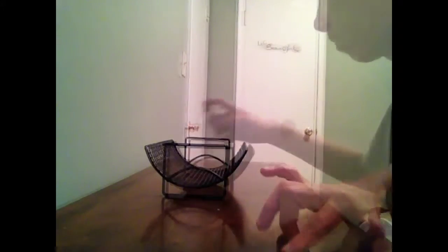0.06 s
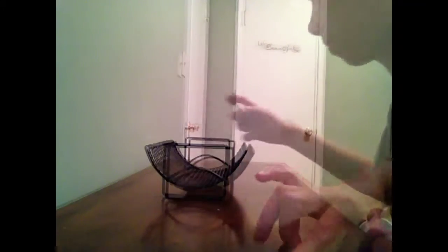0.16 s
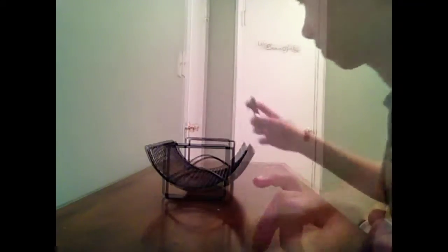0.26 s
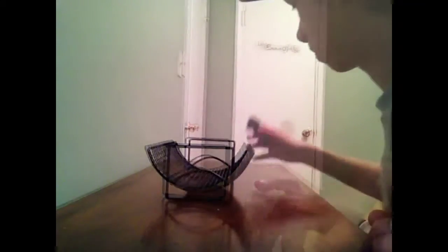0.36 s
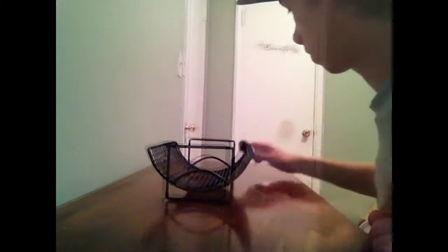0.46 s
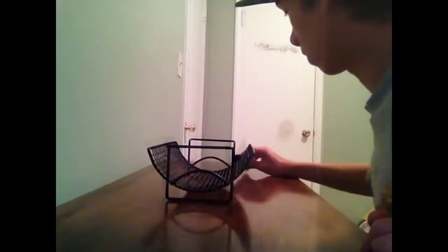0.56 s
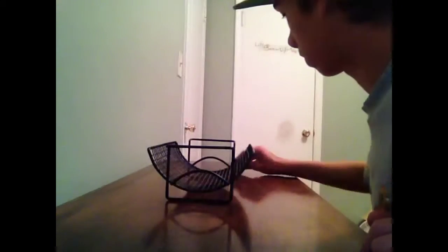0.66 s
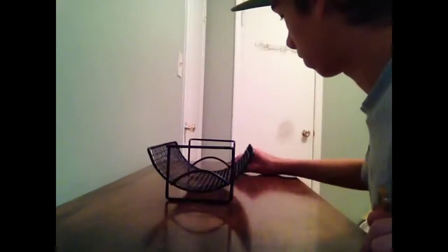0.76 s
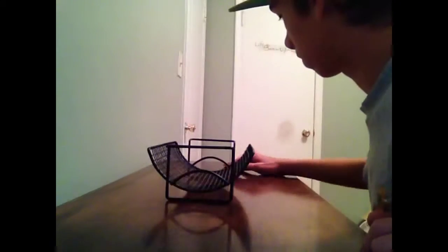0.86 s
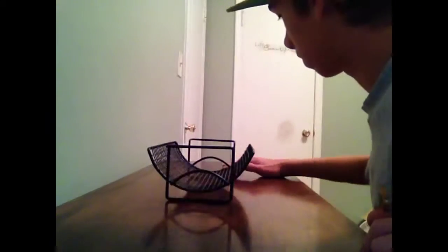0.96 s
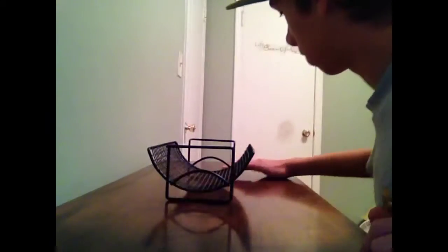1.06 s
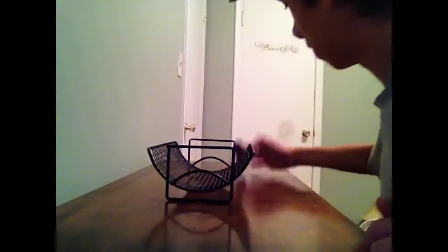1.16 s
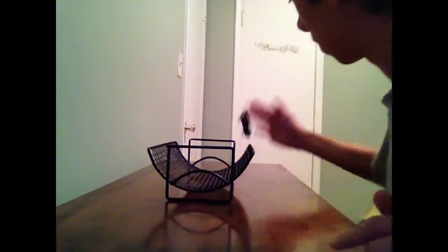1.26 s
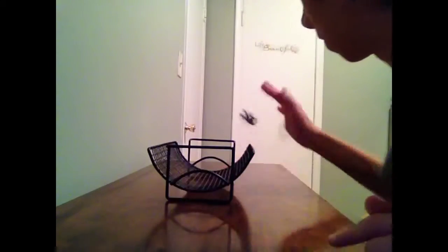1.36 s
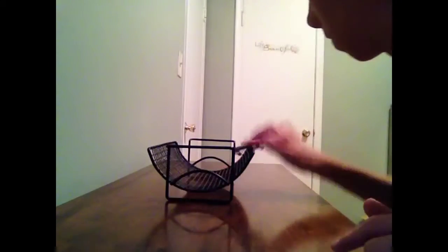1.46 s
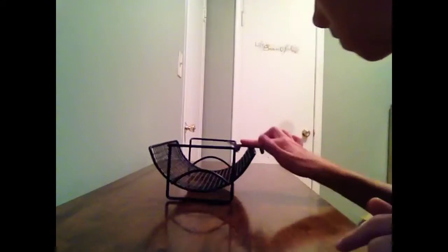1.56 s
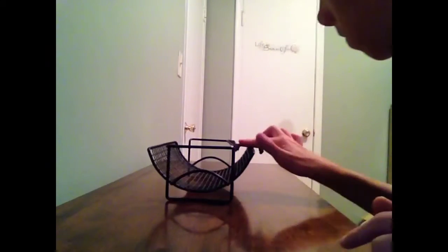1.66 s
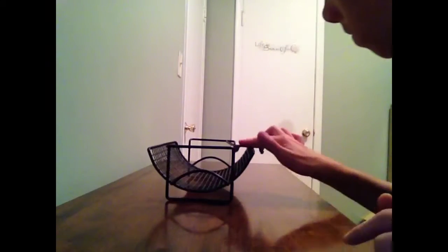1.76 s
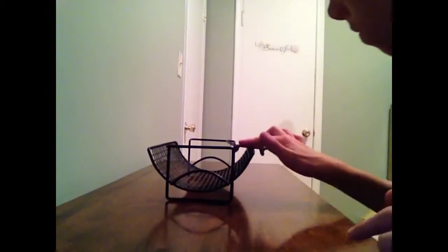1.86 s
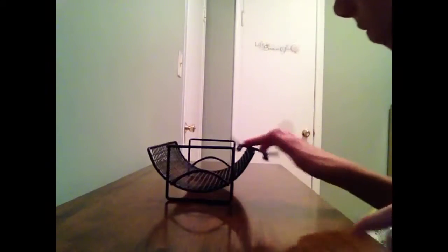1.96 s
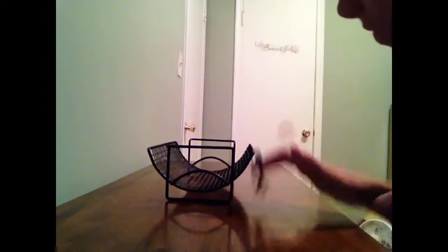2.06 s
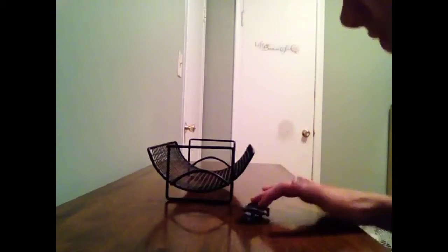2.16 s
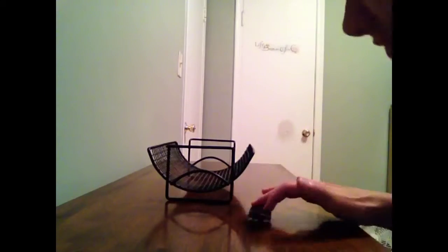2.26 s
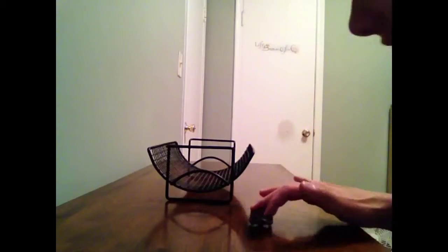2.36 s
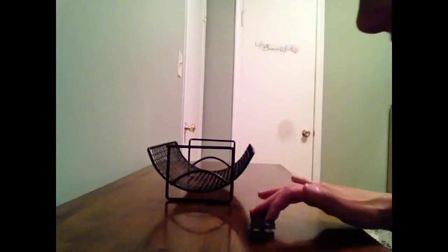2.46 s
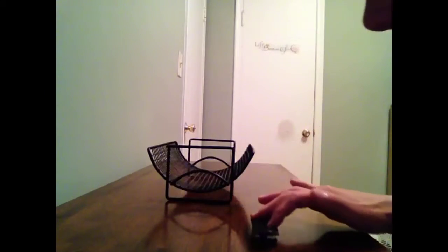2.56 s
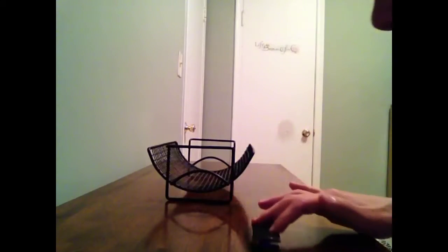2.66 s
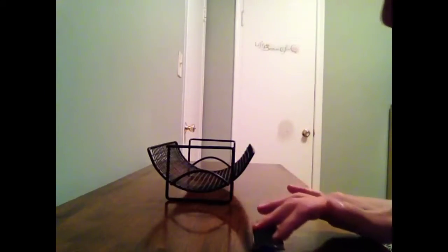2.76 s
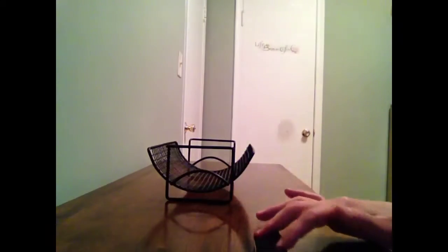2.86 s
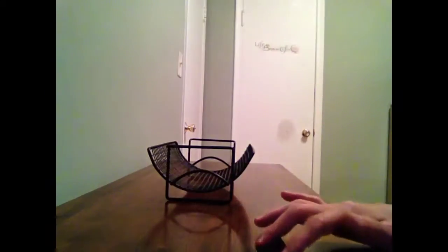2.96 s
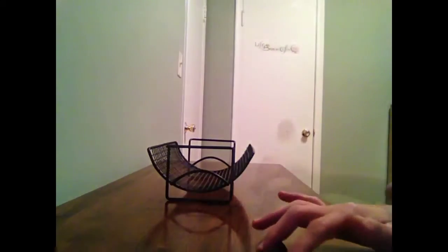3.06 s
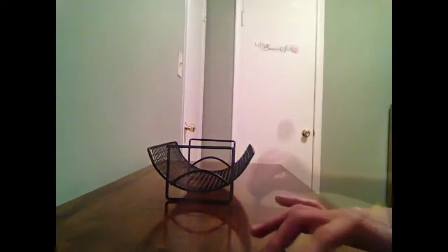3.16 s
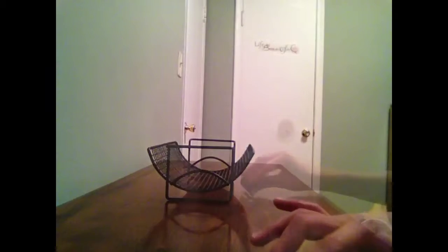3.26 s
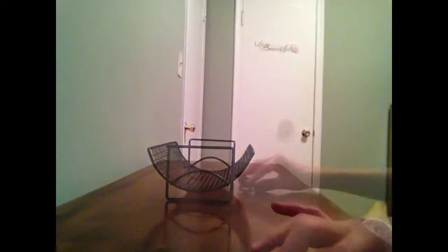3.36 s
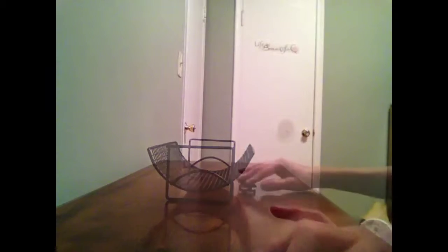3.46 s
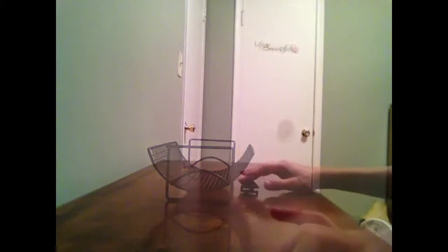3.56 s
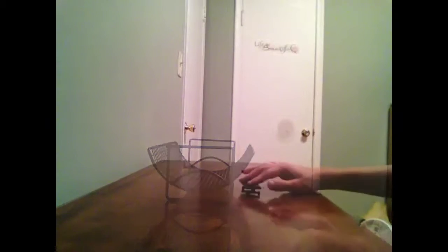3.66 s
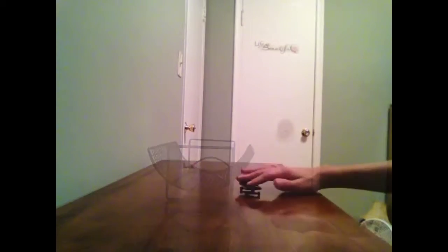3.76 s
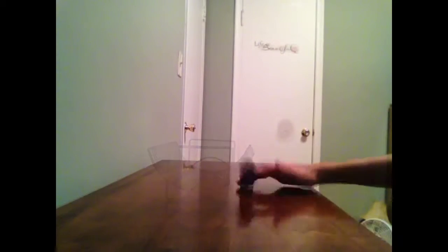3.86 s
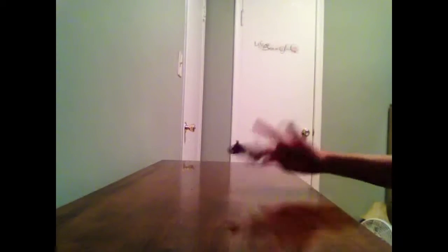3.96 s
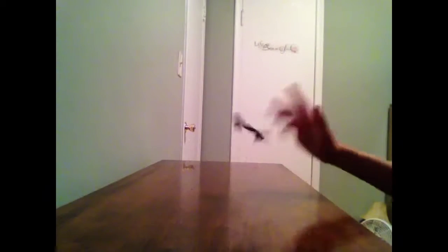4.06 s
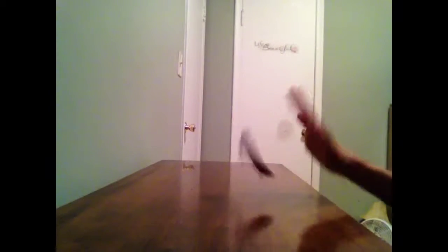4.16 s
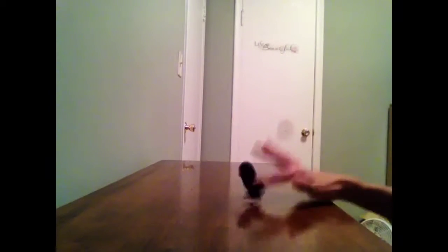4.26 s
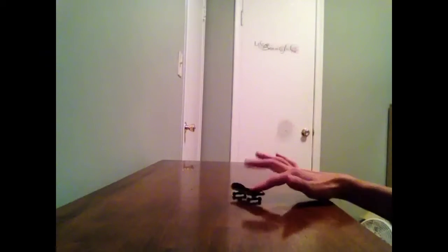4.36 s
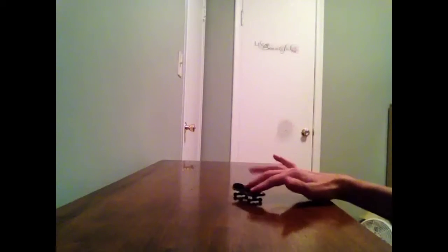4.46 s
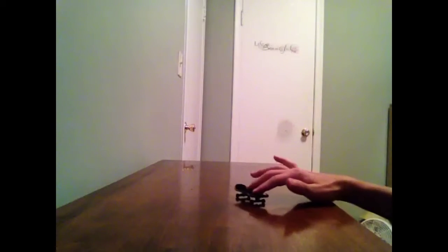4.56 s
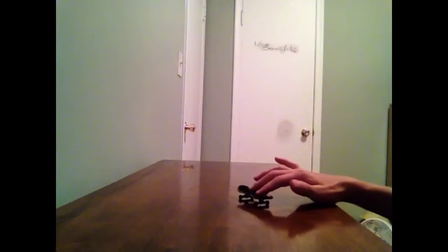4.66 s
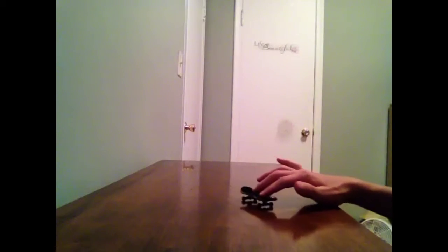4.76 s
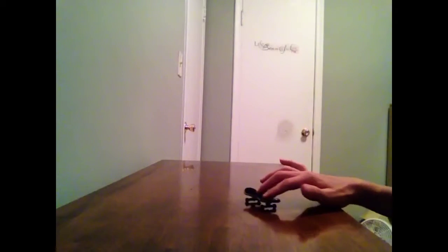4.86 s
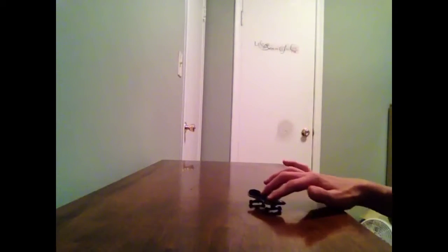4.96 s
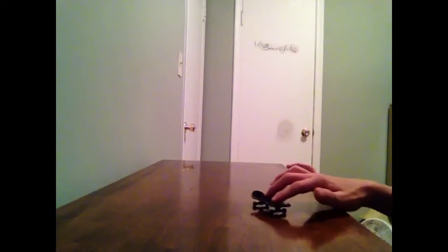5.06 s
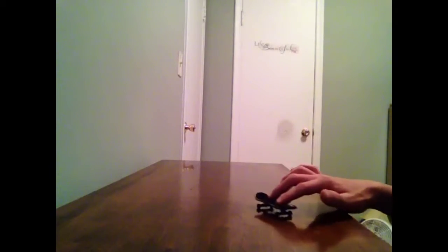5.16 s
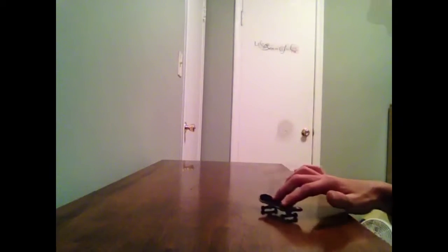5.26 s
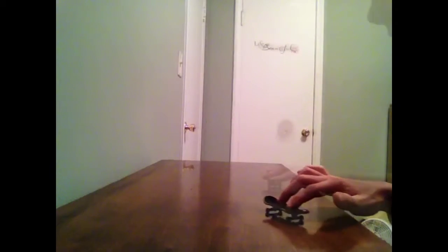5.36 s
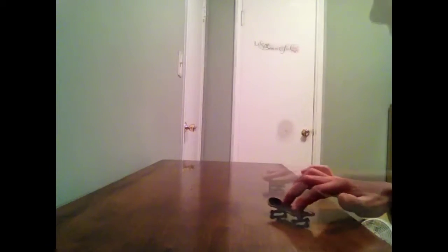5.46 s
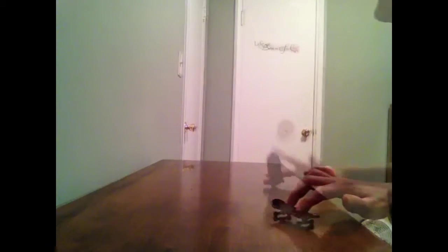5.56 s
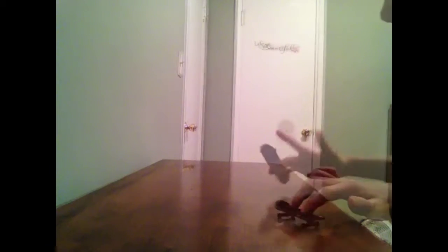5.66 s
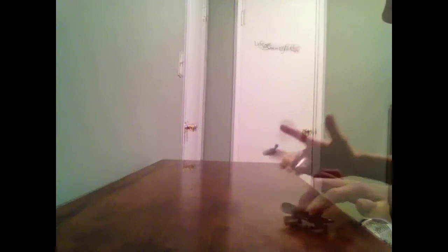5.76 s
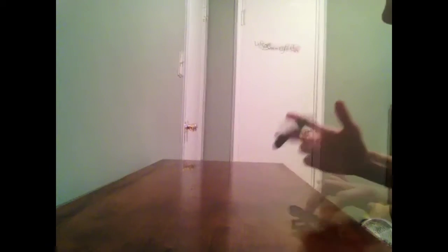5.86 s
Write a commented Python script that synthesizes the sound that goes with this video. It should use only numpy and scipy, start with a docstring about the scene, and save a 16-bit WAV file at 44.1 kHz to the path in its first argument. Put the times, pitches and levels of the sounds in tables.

```python
"""Small wheels rumble and hiss over wood: a fingerboard rolls on a table in a small bare room, heard close up.
It speeds up with a rising whirr, pops onto a metal rack, slides along its rail, drops back and rolls away;
then it is flipped, clatters down on the table and rolls on.
Rolling and sliding are filtered random impacts; a blow is a noisy crack plus the ringing modes of the tabletop.
Light ticks, soft hand bumps and a steady noise floor complete the scene."""
import sys
import numpy as np
from scipy import signal
from scipy.fft import rfft, irfft
from scipy.io import wavfile
from scipy.ndimage import uniform_filter1d

SR = 44100
rng = np.random.default_rng(int(sys.argv[2]) if len(sys.argv) > 2 else 0)


def generate_wav(sig):
    """Save sig (samples, or channels by samples) to the path in sys.argv[1] as 16-bit PCM at SR."""
    pcm = np.round(np.clip(np.atleast_2d(sig).T, -1, 1) * 32767).astype(np.int16)
    wavfile.write(sys.argv[1], SR, pcm)


N = 261072
TIME = np.arange(N) / SR

# Modes of the tabletop: (frequency [Hz], relative level [dB], t60 [s])
TABLE_MODES = [(135.6, 1.5, 0.2), (156.8, -7.5, 0.23), (185.5, -0.5, 0.27), (241.4, -4.5, 0.37),
               (274.3, -0.5, 0.21), (336.1, -1, 0.3), (354.1, -3, 0.26), (428, -2.5, 0.19),
               (460, -3.5, 0.23), (522, -5, 0.34), (554, -10.5, 0.42), (647.3, -5, 0.35), (709, -9, 0.19),
               (769, -5, 0.17), (816, -7.5, 0.23), (1108, -16.5, 0.24), (1227, -0.5, 0.11),
               (1326, -14, 0.36), (1530, -11, 0.099), (1730, -15.5, 0.17), (1897, -12.5, .22),
               (2574, -12, 0.19)]
# Decay of the room tail: (frequency [Hz], t60 [s])
ROOM_DECAY = [(150, 0.29), (500, 0.5), (1300, 0.42), (3000, 0.43), (6000, 0.41), (9000, 0.36),
              (14000, 0.26)]
# Colour of what the room gives back: (frequency [Hz], gain [dB])
WALL_COLOUR = [(150, 2), (400, -2), (1300, 0), (2800, -6.5), (6000, 0.5), (12000, 0.5)]
# First echoes off tabletop and walls: (delay [s], gain [linear])
FIRST_ECHOES = [(.0009, 0.04), (.0034, 0.27), (.0082, 0.23), (0.0191, .12), (0.023, 0.16)]

# Background of room and microphone: (frequency [Hz], relative level [dB per Hz])
AIR_SPECTRUM = [(18, -64), (30, -33.5), (75, -27.5), (141, -6.5), (287, -5.5), (336, -13.5), (461, 0.5),
                (988, -16.5), (1320, -10), (2900, -14), (4420, -8), (7470, -17.5), (9970, -28.5),
                (14800, -25.5), (16000, -51)]
AIR_DB = -61

# Stretches of rolling, steady or slowing down: (start [s], length [s], rumble drive [dB],
# bearing hiss drive [dB], singing of the table [dB], slowing [dB/s])
ROLLS = [(0, 0.39, -41.5, -46, -47, 55), (0.68, 0.35, -41, -46.5, -80, 0),
         (2.209, 0.65, -51.5, -63.5, -51, 9.5), (2.934, 0.94, -46.5, -56, -53.5, 12.5),
         (4.401, 0.43, -55, -74.5, -64, 2.5), (4.878, 1.1, -49.5, -60, -56, 9)]
ROLL_ATTACK_S, ROLL_RELEASE_S = 0.069, 0.07  # time to swell in and to die away
# Wheels over wood grain: (frequency [Hz], relative level [dB per Hz])
RUMBLE_SPECTRUM = [(60, -56.5), (130, -15.5), (240, -6.5), (290, -14), (340, -5), (580, -2.5), (830, -4),
                   (1050, 4), (1300, -5.5), (1600, 1.5), (1900, -7), (2400, -3), (3500, -18.5), (5000, -36)]
# Fizz of the bearings: (frequency [Hz], relative level [dB per Hz])
HISS_SPECTRUM = [(1500, -30), (2500, 4.5), (3000, -6.5), (4300, 6), (5500, -11.5), (7300, -0.5),
                 (9600, -18), (13600, -24), (15500, -19)]
LOOSE_PER_S, LOOSE_DB = 17, -11  # fainter ticks while rolling: mean rate, gain inside the hiss layer
# Resonances kept ringing by the wheels: (frequency [Hz], width [Hz], relative level [dB])
SINGING_MODES = [(1237, 130, 1.5), (1336, 33, 0), (1540, 41, -11.5), (1840, 91, -2.5)]

# Light ticks of loose trucks and fingertips: (time [s], level [dB], brightness [dB per octave])
TICKS = [(0.0384, -35.5, -4.5), (0.101, -37, -0.5), (0.179, -40.5, -1), (0.204, -50, 3), (0.2646, -50, -10),
         (0.347, -50.5, 5), (0.366, -46, 8), (0.628, -42, -0.5), (0.9977, -36, 1), (2.0466, -41.5, 3),
         (2.9441, -49, 0), (3.0187, -40, -0.5), (3.336, -35.5, -3), (3.445, -37, 6), (3.8724, -41.5, -6.5),
         (4.787, -64, 0), (4.891, -47, 2), (5.1912, -43, 5)]
# Soft bumps of the hand on the table: (time [s], drive [dB], upper edge [Hz])
BUMPS = [(0.383, -32, 213), (1.118, -36, 165), (1.533, -13.5, 136)]

# The levels of the three blow tables below drive the blow before its own colours are added.
# Wheels come down on the table: (time [s], clack [dB], tabletop [dB], knock [dB], tick near 12 kHz [dB],
# room [dB], share of the deck's tail [0-1], frequency that the struck spot favours [Hz])
LANDINGS = [(0.636, -22, -43, -30.5, -43.5, 0, 0.33, 426), (0.6962, -27.5, -48, -30, -60, 1, 1, 420),
            (0.7771, -24.5, -43, -30.5, -50, -1, 0.6, 410),
            (0.8441, -6, -22.5, -16.5, -25.5, -.5, 0.07, 394),
            (2.1522, -2.5, -23, -8.5, -31, -5.5, 0.22, 340), (2.1829, -6, -28, -18.5, -18.5, -3, 0, 280),
            (2.1866, -11, -24, -11, -26, -2, 0, 790), (3.1486, -40.5, -52.5, -41.5, -52, 0, 0.1, 307),
            (3.4211, -31, -47.5, -42, -44, -4.5, 0.17, 510), (3.668, -52, -49, -53, -72, 0.5, 0, 605),
            (4.2472, -4.5, -26, -13, -17, -3.5, 0, 530), (4.2612, -2, -35, -18, -24, -7, 0.36, 520),
            (4.314, -2.5, -25, -17.5, -22, -4, 0.3, 358), (4.3532, -4.5, -28, -15, -19, -3, 0, 558)]
# The tail snaps on the table for a jump: (time [s], clack [dB], thump near 140 Hz [dB],
# tabletop near 400 Hz [dB], knock near 1.5 kHz [dB], frequency that the struck spot favours [Hz])
POPS = [(1.198, -9, -29, -21, -18, 404), (3.908, -10.5, -39, -19, -18, 314),
        (5.5927, -19.5, -46, -32, -28, 600)]
# Trucks strike the metal rack, whose feet thump the table: (time [s], clack [dB], thump [dB],
# tabletop [dB], knock [dB], tick [dB], frequency that the struck spot favours [Hz])
RACK_HITS = [(1.4865, -23, -17, -31.5, -23, -29.5, 580), (1.501, -18.5, -22, -28, -23, -22.5, 580),
             (1.515, -12, -10.5, -20.5, -26, -35, 597), (1.5201, -18.5, -30, -24, -14, -35, 620),
             (1.5266, -20, -36, -24.5, -23.5, -35, 263), (1.6427, -15, -13, -17, -13.5, -66.5, 211),
             (1.6572, -20, -42, -15.5, -15.5, -48, 324)]
# Colour of a clack: (frequency [Hz], gain [dB])
CLACK_COLOUR = [(40, -4), (90, -11), (140, 19), (350, 18.5), (700, 20), (1000, 15), (1300, 11.5),
                (2100, 11.5), (2900, 6.5), (4300, 2), (7000, 4), (8600, 4.5), (9800, 2.5), (14500, 6.5)]
# Peaks and dips of the deck when its tail snaps: (frequency [Hz], width [Hz], gain [dB])
DECK_PEAKS = [(387, 90, -1), (576, 57, 4), (1014, 350, -19), (1770, 140, 11), (2000, 250, -16),
              (3170, 67, 15), (4600, 3800, -3), (5780, 630, 4.5), (8900, 300, 7)]

# Fast run-up to the jump; the whirr climbs steadily
RUN_START_S, RUN_LENGTH_S, RUN_DB = 1.02, 0.2, -33
WHIRR_START_HZ, WHIRR_OCTAVES_PER_S, WHIRR_WIDTH_HZ = 1080, 9.3, 700
# Wheel noise of the run-up: (frequency [Hz], relative level [dB per Hz])
WHIRR_SPECTRUM = [(60, -38), (140, -11.5), (300, -26.5), (430, -11.5), (730, -12), (1290, -4),
                  (2100, -11.5), (2700, -6), (3800, -4), (5900, -7.5), (8500, -13), (10000, -25),
                  (15500, -33.5)]
# Wheels bear down and the table's singing swells: (start [s], length [s], level [dB])
SWELLS = [(1.083, .08, -38.5), (2.022, 0.036, -48), (2.802, 0.032, -53.5)]

SLIDE_START_S, SLIDE_LENGTH_S, SLIDE_DB, SLIDE_SLOWING_DB_PER_S = 1.52, 0.5, -38, 1.5
# Drag along the rail: (frequency [Hz], relative level [dB per Hz])
RAIL_SPECTRUM = [(53, -66.5), (90, -30), (136, -8), (295, -13), (334, 1), (377, -7.5), (669, -4.5),
                 (856, -23.5), (910, -34.5), (1400, -17.5), (2190, -31.5), (4680, -30.5), (5510, -52.5),
                 (7490, -33), (12000, -52.5), (15600, -83), (22000, -120)]


def amp(db):
    """Decibels to gain."""
    return 10 ** (np.asarray(db) / 20)


def evened(x):
    """Scales to rms 1."""
    return x / np.sqrt(np.mean(x ** 2) + 1e-20)


def read(points, hz):
    """Reads a spectrum table on a log-frequency axis."""
    f, value = np.transpose(points)
    return np.interp(np.log(hz + 1), np.log(f + 1), value)


def add(mix, s, sound):
    """Lays a sound into the mix at time s."""
    part = mix[max(round(s * SR), 0):][:len(sound)]
    part += sound[:len(part)]


def colour(x, db_at, size=4096):
    """Minimum-phase filter with the gain db_at(Hz), so nothing sounds ahead of its cause."""
    hz = abs(np.fft.fftfreq(size, 1 / SR))
    log_gain = np.log(amp(db_at(hz)) + 1e-6)
    taps = np.fft.ifft(np.exp(np.conj(signal.hilbert(log_gain)))).real
    return signal.fftconvolve(x, taps)[:len(x)]


def waver(per_s):
    """Slow random drift of rms 1."""
    width = max(int(SR / per_s), 1)
    smooth = uniform_filter1d(rng.standard_normal(N), width)
    return evened(uniform_filter1d(smooth, width))


def grit(per_s, spread_db):
    """Tiny random impacts of uneven size."""
    size = amp(spread_db * np.minimum(rng.exponential(1, N), 4))
    strength = size * rng.standard_normal(N)
    return evened(strength * (rng.random(N) < per_s / SR))


def stroke(start, length, slowing_db_per_s, attack_s, release_s):
    """Gain of one movement: it swells up to its start, changes steadily in dB, and dies away after its end."""
    t = TIME - start
    before = np.maximum(-t, 0) / max(attack_s, 0.002)
    after = np.maximum(t - length, 0) / max(release_s, 0.002)
    return amp(-slowing_db_per_s * np.clip(t, 0, length)) * np.exp(-(before + after) ** 2)


def tabletop(db_at, rise_cycles):
    """Ring of the table's modes; the low ones swell more slowly, as the room takes up the sound."""
    t = np.arange(SR * 2 // 3) / SR
    hz, db, t60 = np.transpose(TABLE_MODES)[:, :, None]
    sign = (-1) ** np.arange(len(hz))[:, None]  # neighbouring modes swing opposite ways
    modes = sign * amp(db + db_at(hz) - 60 * t / t60) * np.sin(2 * np.pi * hz * t)
    rise = 1 - np.exp(-t * hz / rise_cycles)
    return (modes * rise).sum(0)


def through_table(x, ring_db, width_hz):
    """Rubbing noise stands out at the table's modes."""
    hz = np.fft.rfftfreq(N, 1 / SR)
    peaks = sum(amp(db) / (1 + 2j * (hz - f) / width_hz) for f, db, _ in TABLE_MODES)
    return irfft(rfft(x) * (1 + amp(ring_db) * peaks), N)


def room_tail(build_s=0.0098):
    """A fresh dense tail in which each band dies at its own rate, the top treble first."""
    hz, t, z = signal.stft(rng.standard_normal(SR * 2 // 3), SR, nperseg=256)
    decay = amp(-60 * t / read(ROOM_DECAY, hz)[:, None])
    tail = signal.istft(z * decay, SR, nperseg=256)[1]
    tail *= 1 - np.exp(-(np.arange(len(tail)) / SR / build_s) ** 2)
    # unit energy ahead of the wall colour
    return colour(tail / np.linalg.norm(tail), lambda f: read(WALL_COLOUR, f))


def room(x, wet_db):
    """A running sound with the room's tail behind it."""
    return x + amp(wet_db) * signal.fftconvolve(x, room_tail())[:N]


def crack(t60, room_db, snap, hold_s):
    """A sharp contact and the brief rattle of the little board, with its echoes and room tail."""
    t = np.arange(SR // 8) / SR
    rattle = rng.standard_normal(len(t)) * amp(-60 * np.maximum(t - hold_s, 0) / max(t60, 0.004))
    rattle[0] += snap
    out = amp(room_db) * np.linalg.norm(rattle) * room_tail()
    for s, gain in [(0.0013, 0.96)] + FIRST_ECHOES:  # the strong direct sound at 1.3 ms; one faint echo comes just before it
        add(out, s, gain * rattle)
    return out


def air():
    """Steady background of room and microphone: coloured noise."""
    return amp(AIR_DB) * evened(colour(rng.standard_normal(N), lambda hz: read(AIR_SPECTRUM, hz)))


def roll_gains():
    """Gains of rumble, hiss and singing: all three share the course of each stretch, summed as power."""
    power = 0
    for start, length, *levels_db, slowing in ROLLS:
        course = stroke(start, length, slowing, ROLL_ATTACK_S, ROLL_RELEASE_S)
        power = power + np.outer(amp(levels_db), course) ** 2
    return np.sqrt(power)


def rolling(rumble_gain, hiss_gain):
    """Wheels cross the grain of the wood while their bearings fizz and the loose trucks tick."""
    grain = through_table(grit(5000, 3.4), ring_db=11.5, width_hz=44)
    rumble = evened(colour(grain, lambda hz: read(RUMBLE_SPECTRUM, hz)))
    hiss = evened(colour(grit(2500, 11.0), lambda hz: read(HISS_SPECTRUM, hz)))
    one_knock = crack(0.01, room_db=-13.5, snap=0.95, hold_s=0)
    knocks = signal.fftconvolve(grit(LOOSE_PER_S, 0.82), one_knock)[:N]
    loose = evened(colour(knocks, lambda hz: read(HISS_SPECTRUM, hz)))
    fizz = amp(-5.5) * hiss + amp(LOOSE_DB) * loose
    wheels = amp(-4.5) * rumble_gain * rumble + hiss_gain * fizz
    return wheels * amp(1.6 * waver(45) + 0.91 * waver(9))


def singing(gain):
    """Rolling keeps a few narrow resonances ringing."""
    hz = np.fft.rfftfreq(N, 1 / SR)
    peaks = sum(amp(db) / (1 + 1j * (hz - f) / width) ** 2 for f, width, db in SINGING_MODES)
    return evened(irfft(rfft(grit(2400, 2.9)) * peaks, N)) * gain


def ticks():
    """Small clicks of the board, too light to move the table."""
    out = np.zeros(N)
    # (frequency [Hz], gain [dB])
    shape = [(100, -20.5), (400, -14), (2200, 1.5), (4500, 4), (8000, -3.0), (10000, -18), (15000, -18.0)]
    for s, db, slope_db in TICKS:
        contact = crack(0.031, room_db=0, snap=3.0, hold_s=0.00055)
        click = colour(contact, lambda hz: read(shape, hz) + slope_db * np.log2((hz + 300) / 5000))
        add(out, s, amp(db) * click)
    return out


def bumps():
    """A soft contact reaches only the lowest modes."""
    out = np.zeros(N)
    for s, db, edge_hz in BUMPS:
        add(out, s, tabletop(lambda hz: db - 20 * np.log10(1 + (hz / edge_hz) ** 4), rise_cycles=0.3))
    return out


def deck(hz):
    """Peaks and dips of the deck's response, dB."""
    return sum(db / (1 + (2 * (hz - f) / width) ** 2) for f, width, db in DECK_PEAKS)


def blow_ripple(depth_db):
    """Each blow has its own slightly uneven treble colour: random gains, rows (Hz, dB)."""
    hz = np.geomspace(1500, 15000, num=40)
    gain_db = depth_db * rng.standard_normal(len(hz)) * (hz > hz[0])
    return np.transpose([hz, gain_db])


def blow(clack_db, thump_db, table_db, knock_db, tick_db, spot_hz, t60, room_db, snap):
    """A clack and a table ring, coloured by where and how hard the board lands; snap is the tail's share (0-1)."""
    snap = np.clip(snap, 0, 1)
    edge_db = clack_db + 0.54 * (tick_db - clack_db) + 3.5  # a soft contact already fades here
    force = [(150, thump_db), (300, table_db), (720, table_db), (1200, knock_db), (2200, knock_db),
             (3600, clack_db), (5000, clack_db), (7800, edge_db), (10500, tick_db),
             (15000, tick_db - 4 * (1 - snap))]

    def drive_db(hz):
        """Strength of this blow at each frequency."""
        spot = np.exp(-(np.log2((hz + 1) / spot_hz) / 0.3) ** 2)
        return read(force, hz) + snap * deck(hz) + 8.4 * spot

    # a snap is one sharp contact; in a landing the wheels' arrivals blur into a held rattle
    contact = crack(t60, room_db, snap=2 + 7 * snap, hold_s=0.0018 * (1 - snap))
    ripple = blow_ripple(depth_db=1.8)
    out = amp(-1.0) * colour(contact, lambda hz: drive_db(hz) + read(CLACK_COLOUR, hz) + read(ripple, hz))
    add(out, 0, amp(-4.5) * tabletop(drive_db, rise_cycles=0.76))
    return out


def landings():
    """The light board rattles down on its wheels, with little bass."""
    out = np.zeros(N)
    for s, clack_db, table_db, knock_db, tick_db, room_db, snap, spot_hz in LANDINGS:
        thump_db = table_db - 11.5
        add(out, s, blow(clack_db, thump_db, table_db, knock_db, tick_db, spot_hz,
                         t60=0.023, room_db=room_db, snap=snap))
    return out


def run_up():
    """The whirr of the wheels climbs as the board speeds up: a resonance gliding over wheel noise."""
    climb_s = np.clip(TIME - RUN_START_S, 0, RUN_LENGTH_S)
    whirr_hz = WHIRR_START_HZ * 2 ** (WHIRR_OCTAVES_PER_S * climb_s)
    grain = through_table(grit(6000, 4.5), ring_db=4.5, width_hz=69)
    drive = evened(colour(grain, lambda hz: read(WHIRR_SPECTRUM, hz)))
    # shift the gliding pitch down to zero, smooth there, and shift back
    turn = np.exp(2j * np.pi * np.cumsum(whirr_hz) / SR)
    r = np.exp(-np.pi * WHIRR_WIDTH_HZ / SR)
    whirr = 2 * (turn * signal.lfilter([1 - r], [1, -r], drive / turn)).real
    # negative slowing: it grows louder
    growth = stroke(RUN_START_S, RUN_LENGTH_S, slowing_db_per_s=-12, attack_s=0.02, release_s=0.0023)
    return amp(RUN_DB) * growth * (0.33 * drive + 1.48 * whirr)


def swells():
    """Gain of the table's singing while the wheels bear down."""
    return sum(amp(db) * stroke(s, length, slowing_db_per_s=15, attack_s=0.022, release_s=0.03)
               for s, length, db in SWELLS)


def pops():
    """Short, dry and bright: the tail alone hits the wood."""
    out = np.zeros(N)
    for s, clack_db, thump_db, table_db, knock_db, spot_hz in POPS:
        tick_db = clack_db - 11.5
        add(out, s, blow(clack_db, thump_db, table_db, knock_db, tick_db, spot_hz,
                         t60=0.027, room_db=-6.0, snap=0.69))
    return out


def rack_hits():
    """The board clatters onto the rack, which passes a heavy thump to the table."""
    out = np.zeros(N)
    for s, *strike in RACK_HITS:
        add(out, s, blow(*strike, t60=0.036, room_db=-4, snap=0.2))
    return out


def slide():
    """The trucks drag along the rail, and the rack's feet shake the table."""
    scrape = through_table(grit(2500, 2.5), ring_db=9.5, width_hz=9.3)
    drag = evened(colour(scrape, lambda hz: read(RAIL_SPECTRUM, hz)))
    movement = stroke(SLIDE_START_S, SLIDE_LENGTH_S, SLIDE_SLOWING_DB_PER_S, attack_s=0.033, release_s=0.11)
    return drag * amp(SLIDE_DB) * movement


def scene():
    """All sounds of the board in the room, on one microphone."""
    rumble_gain, hiss_gain, sing_gain = roll_gains()
    wheels = room(rolling(rumble_gain, hiss_gain) + run_up(), wet_db=-3.0)
    wheels = wheels + singing(sing_gain + swells())
    blows = landings() + pops() + rack_hits()
    return (air() + wheels + ticks() + bumps() + blows + slide())[None]


def record(dry):
    """The microphone sheds deep bass, overloads on the hardest clacks and is band-limited."""
    thin = signal.sosfilt(signal.butter(10, 116, "highpass", fs=SR, output="sos"), dry)
    thin = thin + amp(-38.0) * dry  # a little bass leaks past the filter
    limited = thin / (1 + thin ** 6) ** (1 / 6)
    lowpass = signal.firwin(511, 15600, window=("kaiser", 9), fs=SR)  # upper edge in Hz
    return signal.oaconvolve(limited, lowpass[None], "same")


dry = scene()
out = record(dry)
generate_wav(out)
```